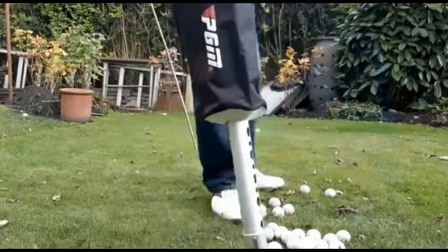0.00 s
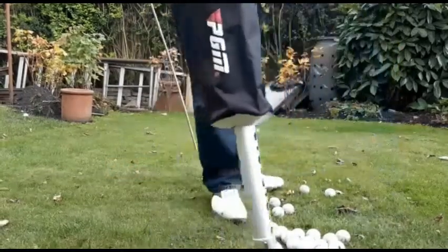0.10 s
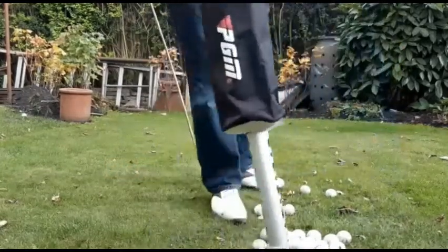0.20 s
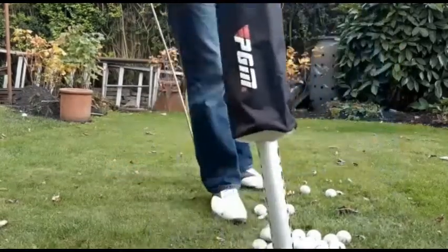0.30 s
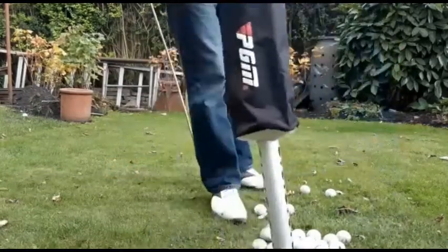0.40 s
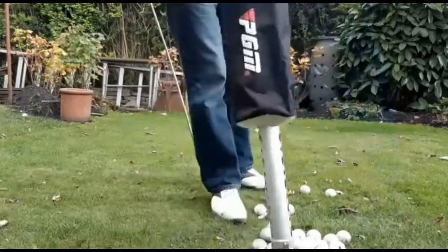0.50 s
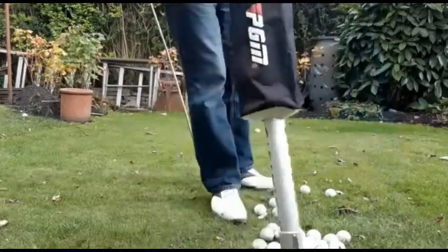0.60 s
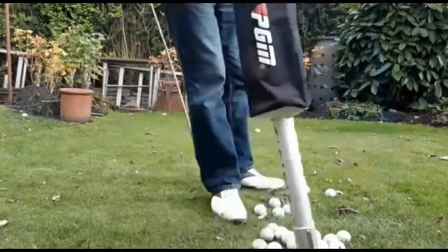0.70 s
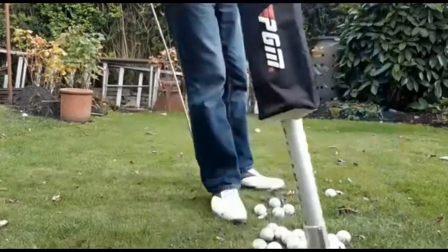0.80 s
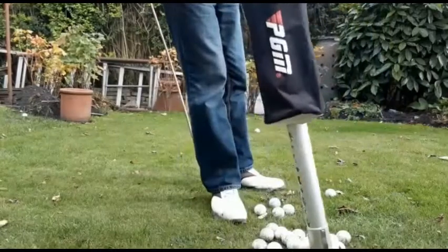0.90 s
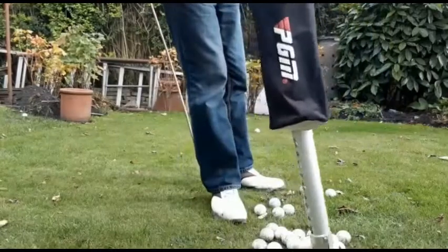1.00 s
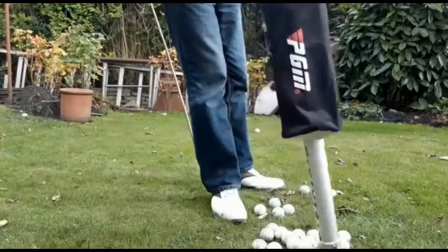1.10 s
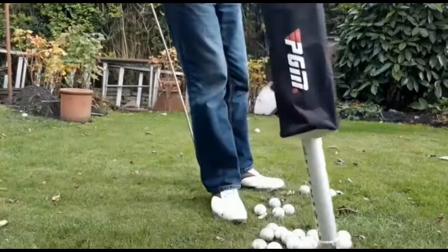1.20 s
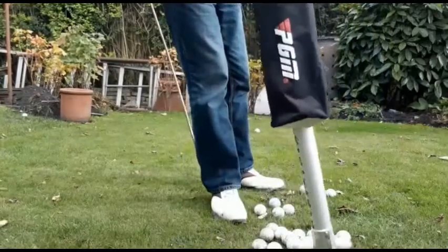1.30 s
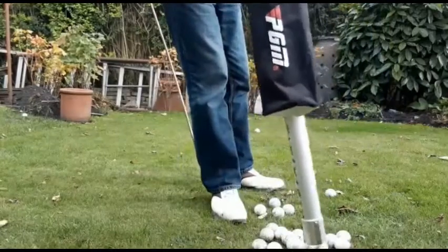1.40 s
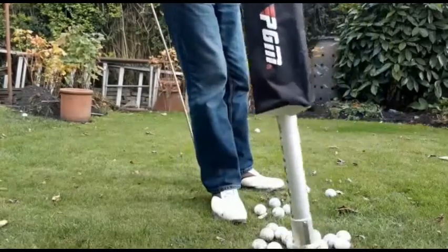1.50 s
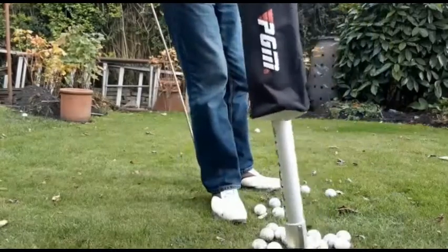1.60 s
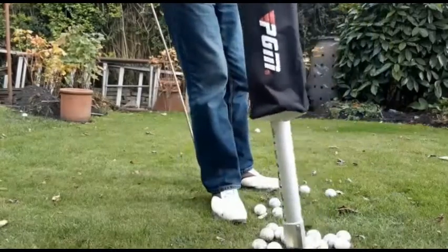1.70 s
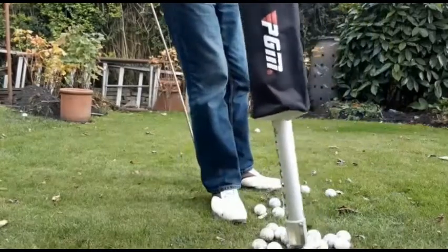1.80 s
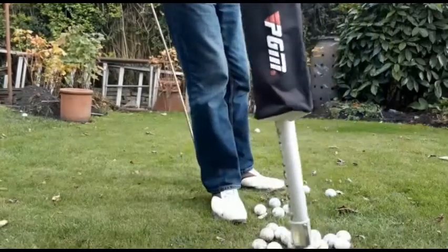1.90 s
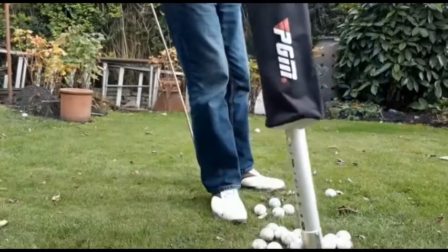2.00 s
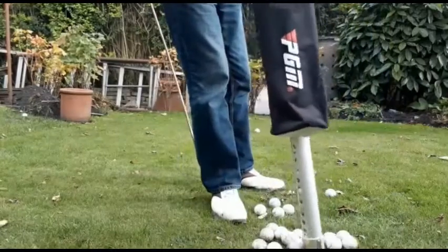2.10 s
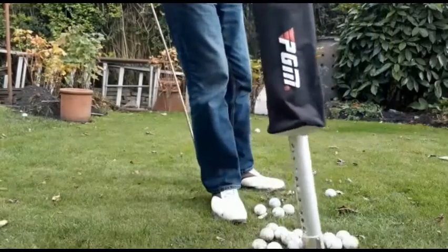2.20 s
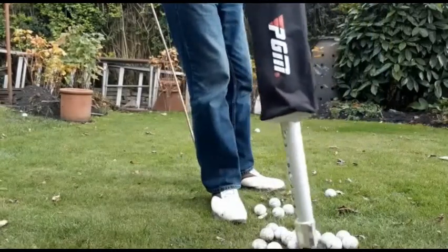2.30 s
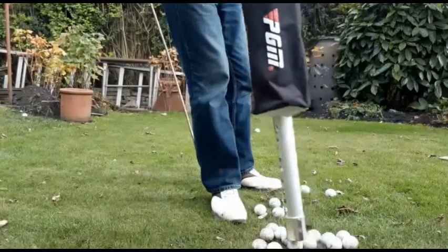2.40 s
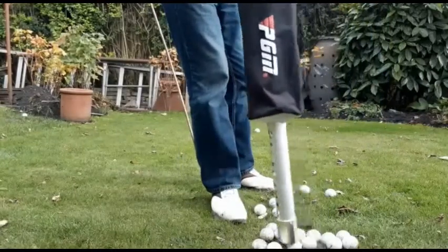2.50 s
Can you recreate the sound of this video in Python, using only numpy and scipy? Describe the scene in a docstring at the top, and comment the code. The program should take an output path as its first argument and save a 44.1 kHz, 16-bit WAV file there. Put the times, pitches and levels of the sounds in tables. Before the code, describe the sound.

Golf balls snap into a hollow aluminium tube on a lawn, heard close and nearly central. Clicks gather from 0.15 s to a ringing clack at 0.32 with a soft thump. A hollow bump at 0.93 leads to a brighter, springy double clack with ball knocks at 1.09. Faint ticks near 1.8, a third clack at 2.07, light contacts from 2.5. Faint hum drops out around 1.45-1.8; soft outdoor air continues.

```python
"""A low hum and distant outdoor noise, then an aluminium pick-up tube is pressed over golf balls on a lawn,
three times, and starts on a fourth. Ball and rim contacts are short noise bursts that excite decaying tube modes;
each ball squeezes past the catch with a loud grainy clack, and balls knock together as pitched tocks.
The catch twangs, the turf answers with thumps and hollow bumps, and the garden returns a faint diffuse tail."""
import sys
import numpy as np
from scipy import signal
from scipy.fft import rfft, irfft, next_fast_len
from scipy.io import wavfile
from scipy.ndimage import map_coordinates

SR = 44100
rng = np.random.default_rng(int(sys.argv[2]) if len(sys.argv) > 2 else 0)


def inscribe(sig):
    """Save sig as 16-bit PCM at rate SR to the path in sys.argv[1].

    A 1-D sig is mono; a 2-D sig holds one channel per row.
    Samples are clipped to [-1, 1] before scaling.
    """
    pcm = np.round(np.clip(np.atleast_2d(sig).T, -1, 1) * 32767)
    wavfile.write(sys.argv[1], SR, pcm.astype(np.int16))


N = 114660  # samples

# a ball snaps past the catch: (t/s, level/dB, swell t60/s, fall t60/s, treble/dB, ring/dB, upper modes/dB, catch/dB)
CLACKS = [(0.318, -14.5, 0.056, 0.089, -3.5, -2, 2, -25),
          (1.092, -15.5, 0.043, 0.065, 7.5, -6.5, 10.5, -3.5), (1.096, -17, .025, 0.069, -4, -3.5, 10, -9),
          (2.072, -16, 0.038, 0.078, -2, -5, 1, -3)]
# spectrum of a light contact or rub: (f/Hz, density/dB per Hz)
CLICK_COLOUR = [(100, -13.5), (330, 0.5), (520, -0.5), (750, -6), (1050, -1.5), (1600, 0), (2100, -10),
                (2900, -6), (4200, -10.5), (5200, -16.5), (8000, -18), (8800, -28.5), (11500, -24.5),
                (15500, -29.5)]
CLICK_RISE_S = 0.0008  # time constant of every struck onset
UPPER_MODES_HZ = 2200  # modes above this have a level of their own
CREEP_PER_S = 0.012  # share by which the tube modes rise each second as the tube fills


def amp(db):
    """Level to amplitude: 20 dB is a factor of ten."""
    return 10 ** (np.asarray(db) / 20)


def unit(x):
    """Normalisation to equal power: rms 1."""
    return x / np.sqrt(np.mean(x ** 2) + 1e-20)


def along(points, hz):
    """Interpolation of (f/Hz, value) points on a logarithmic frequency axis."""
    f, v = np.transpose(points)
    return np.interp(np.log(hz + 1), np.log(f + 1), v)


def fade(t, t60):
    """Exponential decay of a damped vibration, 60 dB in t60."""
    return amp(-60 * t / t60)


def swell(t, rise, fall):
    """Two-sided exponential envelope: grows up to t = 0, then decays, each by 60 dB in its time."""
    growth = fade(np.maximum(-t, 0), rise)
    return growth * fade(np.maximum(t, 0), fall)


def onset(t):
    """Finite contact time: a struck sound builds up exponentially."""
    return 1 - np.exp(-t / CLICK_RISE_S)


def wobble(rate):
    """Random modulation: straight lines between Gaussian knots, rate of them a second."""
    knots = rng.standard_normal(N // 8)
    return map_coordinates(knots, [np.arange(N) * rate / SR], order=1, mode="wrap")


def filtered(x, response):
    """Linear filtering: the spectrum is multiplied by a frequency response."""
    n = x.shape[-1]
    m = next_fast_len(n + 4096)
    return irfft(rfft(x, m) * response(np.fft.rfftfreq(m, 1 / SR)), m)[..., :n]


def below(x, edge_hz):
    """Zero-phase low-pass filter: the gain is one half at the edge."""
    return filtered(x, lambda hz: 1 / (1 + (hz / edge_hz) ** 10))


def noise(colour):
    """Spectral shaping of two unrelated white noises, together of rms 1."""
    white = rng.standard_normal((2, N))
    return unit(filtered(white, lambda hz: amp(along(colour, hz))))


def widen(pair, width):
    """Sum-and-difference stereo: a shared part plus and minus a side part."""
    shared, side = pair[0], width * pair[1]
    return np.array([shared + side, shared - side])


def add(track, s, sound):
    """Superposition: mixes a sound in at time s."""
    part = track[..., max(round(s * SR), 0):][..., :sound.shape[-1]]
    part += sound[..., :part.shape[-1]]


def note(modes, t):
    """Modal superposition: (f/Hz, level/dB, t60/s) damped sines struck at t = 0."""
    sines = sum(amp(db) * fade(t, t60) * np.sin(2 * np.pi * hz * t) for hz, db, t60 in modes)
    return sines * onset(t)


def bands(colour):
    """Band splitting of stereo contact noise into bass, middle and treble."""
    # (f/Hz, side over shared amplitude)
    spread = [(300, 0.092), (2000, 0.072), (5000, 0.22), (12000, 0.6)]
    bass_edge_hz, treble_edge_hz = 790, 5000
    parts = filtered(noise(colour), lambda hz: np.array([np.ones_like(hz), along(spread, hz)]))
    pair = widen(parts, 1)
    bass = below(pair, bass_edge_hz)
    treble = pair - below(pair, treble_edge_hz)
    return bass, pair - bass - treble, treble


def hum():
    """Harmonic tones with random level and phase modulation; they drop away for a while in the middle."""
    # (t/s, level/dB)
    hum_level = [(0, -50.5), (.5, -55.5), (.9, -57.5), (1.3, -52), (1.45, -75), (1.8, -72), (1.98, -51.5),
                 (2.3, -52.5), (2.6, -48.5)]
    # (f/Hz, level/dB)
    partials = [(100, -1.5), (200, 0)]
    t = np.arange(N) / SR
    lines = 0
    for hz, db in partials:
        level = amp(db + 1.7 * wobble(47))  # dB, knots a second
        lines = lines + level * np.sin(2 * np.pi * hz * t + 1.1 * wobble(12))  # rad, knots a second
    return amp(np.interp(t, *np.transpose(hum_level))) * lines


def air():
    """Partially coherent outdoor noise, nearly mono in the upper bass; its hiss comes and goes."""
    # spectrum: (f/Hz, density/dB per Hz)
    spectrum = [(20, -35.5), (40, -17.5), (70, 0), (130, -4), (300, -3.5), (420, -16.5), (900, -12),
                (1600, -16), (2700, -31), (5000, -36), (7500, -36.5), (8600, -45), (16000, -44)]
    # left-right likeness: (f/Hz, correlation)
    likeness = [(30, 0.24), (150, .93), (1000, 0.28), (5000, 0.11)]
    # (t/s, level/dB)
    air_level = [(0, -52), (.7, -51), (1.35, -56.5), (1.5, -53), (1.9, -49.5), (2.3, -54), (2.6, -52)]
    # gain of the treble: (t/s, level/dB)
    treble_level = [(0, -3.5), (.3, 11.5), (.85, -4), (1.35, 9.5), (1.47, -2.5), (1.9, -5.5), (2.25, 4.5),
                    (2.5, -5.5)]
    hiss_edge_hz = 1600
    t = np.arange(N) / SR

    def shares(hz):
        # cos^2 - sin^2 of half the angle is the wanted correlation
        angle = np.arccos(np.clip(along(likeness, hz), -1, 1)) / 2
        return np.array([np.cos(angle), np.sin(angle)])

    pair = widen(filtered(noise(spectrum), shares), 1)
    low = below(pair, hiss_edge_hz)
    hiss = (pair - low) * amp(np.interp(t, *np.transpose(treble_level)))
    level_db = np.interp(t, *np.transpose(air_level)) + 3.17 * wobble(5.564)
    return amp(level_db) * (low + hiss)


def knocks():
    """Modal impact of ball on ball: a short pitched tock whose overtone balance varies with the hit."""
    # (t/s, level/dB, pitch f/Hz, overtones above UPPER_MODES_HZ/dB)
    hits = [(0.073, -42.5, 1480, 0.5), (1.01, -34.5, 1313, -8.5), (1.013, -28.5, 1565, 3),
            (1.024, -31.5, 1586, 4), (1.074, -30.5, 1500, 5), (1.096, -20.5, 1553, 6),
            (1.663, -56, 1450, -10), (1.785, -45, 1484, -5.5), (1.99, -29.5, 1642, 3),
            (2.031, -27.5, 1612, 9.5)]
    # (multiple of the pitch, level/dB, t60/s)
    ball_modes = [(1, 4, .075), (1.12, -13.5, .05), (1.78, -3.5, .055), (2.35, -9, .06)]
    out, t = np.zeros(N), np.arange(SR // 8) / SR
    for s, db, pitch, overtones_db in hits:
        modes = []
        for multiple, level, t60 in ball_modes:
            hz = pitch * multiple
            modes.append((hz, level + overtones_db * (hz > UPPER_MODES_HZ), t60))
        add(out, s, amp(db) * note(modes, t))
    return out


def ring(blows):
    """Modal excitation of the damped tube: each (t/s, level/dB, upper modes/dB) blow weights the modes anew."""
    # modes of the tube held against the turf: (f/Hz, level/dB, t60 before choking/s)
    tube_modes = [(505, -14, .25), (1036, -9, .3), (1120, -16, 0.14), (1345, -14, 0.18), (1445, -12, .1),
                  (1540, -12, .12), (2780, -14, 0.16), (2900, -6.5, 0.17), (3045, -13, .14),
                  (3250, -19, .11), (3510, -21, 0.1), (3930, -18, 0.09), (6210, -30, .2)]
    choke_s = 0.054  # turf and balls smother the ring after about this long
    scatter_db = 2.5  # standard deviation of each mode's level
    out, t = np.zeros(N), np.arange(SR // 4) / SR
    hz, db, t60 = np.transpose(tube_modes)[..., None]
    decays = amp(db) * fade(t, t60) * np.exp(-(t / choke_s) ** 2) * onset(t)
    for s, level, upper in blows:
        scatter = scatter_db * rng.standard_normal(hz.shape)
        sizes = amp(level + upper * (hz > UPPER_MODES_HZ) + scatter)
        cycles = hz * (1 + CREEP_PER_S * s) * t + rng.random(hz.shape)
        add(out, s, np.sum(sizes * decays * np.sin(2 * np.pi * cycles), axis=0))
    return out


def clicks():
    """Impulsive contact: a noise crack with a tail, which also excites the tube's modes."""
    # a ball touches the rim, the wall or another ball: (t/s, level/dB, treble/dB, bass/dB, ring/dB)
    contacts = [(0.074, -46.5, -4, 10.5, -9), (0.136, -42.5, 17.5, 4.5, -2), (.148, -35.5, 0, -2, -5),
                (.173, -27.5, 0, -7, -8), (0.182, -32, 2, -2, -10), (0.201, -24, -6.5, -0.5, -17),
                (0.231, -33, -1, 5, 5), (0.256, -42, 8, 3, 2), (0.288, -35, 2, 5, -3),
                (.299, -23, -9, -11, -17), (0.341, -21, -2.5, 2, -18), (0.353, -25, -3, -4, -6),
                (.362, -25.5, -3, -13, 1.5), (.377, -28, 0, -4, -19), (0.409, -38, 3, 7, 3),
                (0.434, -41, -7, 5, -14), (.487, -47.5, 0, 7, -4), (0.53, -45, -17, -6, -1),
                (0.919, -48.5, -7, 3, 0.5), (0.936, -51.5, 15.5, 14, -2), (0.943, -42.5, -8, 0, -12),
                (1.007, -27, -6, -7, -16), (1.023, -26, 1.5, -7.5, -34), (1.033, -28, 0, 4.5, -26),
                (1.043, -26.5, -2, -6, -17), (1.059, -31.5, -2, -1, 2), (1.071, -24.5, 4.5, -1.5, -7.5),
                (1.09, -19, -6, -1, -12.5), (1.158, -48.5, 14, 20.5, -16), (1.175, -37, -7, -2, 1),
                (1.195, -35.5, -9, 0.5, -30), (1.24, -47, -17, 8, -18), (1.281, -48.5, -3, -1, -18),
                (1.298, -47, -2.5, -5, -3.5), (1.784, -45, -10, -2, -15.5), (1.94, -52.5, -17, 13, -14.5),
                (1.976, -31, -11.5, -5, -18.5), (1.989, -32, 1.5, 0.5, -12), (2, -24, -12, -20, -4),
                (2.010, -21, 4, -4.5, -15), (2.028, -21.5, 1, 0, -9.5), (2.055, -26.5, 1, 6.5, -14),
                (2.096, -29, -5, 7.5, -11), (2.12, -39, 5, 3, 10), (2.151, -36.5, 1, 8.5, -3.5),
                (2.217, -54, -6, 5.5, -10), (2.507, -41.5, 3.5, 5, -18), (2.521, -30, 1, 6, -13),
                (2.578, -51, 6, 13, 3), (2.591, -35.5, -12, 4, -12)]
    click_db, click_ring_db = -1.5, 1.5  # added to every level and every ring
    crack_db, crack_t60_s, tail_t60_s = 1.5, 0.012, 0.1  # crack level is over the tail
    power, t = np.zeros((3, N)), np.arange(SR // 8) / SR
    shape = (amp(crack_db) * fade(t, crack_t60_s) + fade(t, tail_t60_s)) * onset(t)
    for s, db, treble, bass, _ in contacts:
        band_db = click_db + db + np.array([[bass], [0], [treble]])
        add(power, s, (amp(band_db) * shape) ** 2)  # unrelated bursts add in power
    cracks = sum(np.sqrt(p) * band for p, band in zip(power, bands(CLICK_COLOUR)))
    return cracks + ring([(s, db + ring_db + click_ring_db, 0) for s, db, _, _, ring_db in contacts])


def free_ring():
    """Light damping: a tube struck clear of the turf sings in a few clear modes until the turf smothers it."""
    # (f/Hz, level/dB, t60 before smothering/s)
    free_modes = [(1035, -2, .42), (1355, -13, .24), (2801, -11, .27), (2889, -14, .22), (3128, -17, .2),
                  (5185, -21, .36), (5508, -30, .27)]
    # (t/s, level/dB, smothering time of the lowest mode/s, brightness/dB per octave)
    free_blows = [(.203, -25, .06, 0), (.319, -15.5, .105, 1.5), (1.034, -17.5, .015, -9),
                  (2.119, -34, .06, -5)]
    out, t = np.zeros(N), np.arange(SR // 3) / SR
    for s, db, smother, tilt in free_blows:
        for hz, level, t60 in free_modes:
            ratio = hz / free_modes[0][0]
            lasts = smother * np.sqrt(ratio)  # the low modes move the rim most and stop first
            mode = (hz * (1 + CREEP_PER_S * s), db + level + tilt * np.log2(ratio), t60)
            add(out, s, note([mode], t) * np.exp(-(t / lasts) ** 4))
    return out


def rubs():
    """Sliding friction: grainy noise in bell-shaped strokes while the rim finds the next ball."""
    # the rim rubs over balls and grass: (t/s, half length/s, level/dB, treble/dB)
    strokes = [(0.247, 0.041, -42, -2), (0.373, 0.024, -42.5, 10), (0.807, 0.046, -67, 11.5),
               (0.995, 0.04, -47.5, 5), (1.124, 0.025, -42, -5.5), (1.67, 0.015, -61, -18),
               (1.982, 0.015, -48.5, -6), (2.567, 0.024, -53.5, -5)]
    grain_db, grains_per_s = 2, 970
    t = np.arange(N) / SR
    bass, middle, treble = bands(CLICK_COLOUR)
    friction = 0
    for s, half, db, treble_db in strokes:
        bell = np.exp(-np.minimum(((t - s) / half) ** 2, 100) / 2)
        friction = friction + amp(db) * bell * (bass + middle + amp(treble_db) * treble)
    return friction * unit(amp(grain_db * wobble(grains_per_s)))


def clacks():
    """Friction and release: the catch scrapes over the ball and lets go, exciting the tube's modes."""
    # (f/Hz, density/dB per Hz)
    clack_colour = [(100, -22), (300, -3.5), (520, -3.5), (750, -4.5), (1050, 0), (1550, 0), (2100, -8),
                    (2900, -3), (3900, -4.5), (4900, -12.5), (7800, -10), (8900, -17.5), (12000, -15.5),
                    (15500, -17.5)]
    clack_ring_db = -1  # added to every ring
    grain_db, grains_per_s = 0.5, 940
    power, t = np.zeros((3, N)), np.arange(-SR // 8, SR // 3) / SR
    for s, db, rise, fall, treble, *_ in CLACKS:
        band_db = db + treble * np.array([[0], [0], [1]])
        add(power, s + t[0], (amp(band_db) * swell(t, rise, fall)) ** 2)
    grain = unit(amp(grain_db * wobble(grains_per_s)))
    scrape = grain * sum(np.sqrt(p) * band for p, band in zip(power, bands(clack_colour)))
    blows = [(s, db + ring_db + clack_ring_db, upper) for s, db, _, _, _, ring_db, upper, _ in CLACKS]
    return scrape + ring(blows)


def twangs():
    """Free vibration of a released spring: the catch twangs as it lets go."""
    # (f/Hz, level/dB, t60/s)
    catch_modes = [(3655, 0.5, .045), (3960, -3, 0.076), (4200, -3, 0.073)]
    out, t = np.zeros(N), np.arange(SR // 8) / SR
    for s, db, *_, catch_db in CLACKS:
        add(out, s, amp(db + catch_db) * note(catch_modes, t))
    return out


def thumps():
    """Dull impact on soft ground: low noise swells and dies as the rim pushes into the lawn."""
    # (f/Hz, density/dB per Hz)
    thump_colour = [(25, -65), (42, -21.5), (65, -2), (115, 4.5), (200, -6), (400, -19.5), (1000, -76.5)]
    # the tube lands on the turf: (t/s, level/dB)
    landings = [(0.333, -32.5), (1.118, -37.5), (2.089, -41), (2.189, -51)]
    swell_t60_s, fall_t60_s = 0.047, 0.38
    t = np.arange(N) / SR
    envelope = sum(amp(db) * swell(t - s, swell_t60_s, fall_t60_s) for s, db in landings)
    return envelope * noise(thump_colour)[0]


def bumps():
    """Heavily damped resonance: one low hollow note for each ball shoved into the turf."""
    # (t/s, level/dB, pitch f/Hz)
    shoves = [(.935, -34, 367), (1.157, -44, 444), (2.521, -41, 424)]
    bump_t60_s = 0.1
    out, t = np.zeros(N), np.arange(SR // 8) / SR
    for s, db, hz in shoves:
        soft_start = 1 - np.exp(-t * hz)  # time constant of one period
        add(out, s, note([(hz, db, bump_t60_s)], t) * soft_start)
    return out


def garden(x):
    """Diffuse scattering by fence and shrubs: convolution with a short noise tail whose bass lasts longest."""
    # (f/Hz, t60/s)
    decay_times = [(200, 0.8), (1200, 0.39), (3500, 0.27), (8000, 0.29), (15000, 0.27)]
    build_up_s, width = 0.0077, 0.77  # time constant; side over shared part
    hz, t, z = signal.stft(rng.standard_normal((2, SR // 2)), SR, nperseg=256)
    envelope = fade(t, along(decay_times, hz)[:, None]) * (1 - np.exp(-t / build_up_s))
    tail = signal.istft(z * envelope, SR, nperseg=256)[1]
    tail = widen(tail, width)
    return signal.fftconvolve(x, tail / np.linalg.norm(tail[0]), axes=1)[:, :N]


def scene():
    """Interaural differences: the tube is later on the left, and the right channel is a little louder."""
    # the tube moves to the right and back: (t/s, lag of the left channel/ms)
    left_lag = [(.2, 0.014), (0.351, 0.032), (0.999, 0.061), (1.099, 0.06), (2.052, 0.054), (2.55, 0.037)]
    garden_db, right_db = -18, 0.61  # the right is raised and the left lowered by right_db
    left, right = knocks() + clicks() + free_ring() + rubs() + clacks() + twangs() + thumps() + bumps()
    lag = np.interp(np.arange(N) / SR, *np.transpose(left_lag)) * SR / 1000  # samples
    tube = np.array([map_coordinates(left, [np.arange(N) - lag]), right])
    return (hum() + air() + tube + amp(garden_db) * garden(tube)) * amp([[-right_db], [right_db]])


def record(dry):
    """Band limitation: a very steep low-pass filter leaves almost nothing above its edge."""
    top_hz = 16000
    return filtered(dry, lambda hz: 1 / np.sqrt(1 + (hz / top_hz) ** 400))


dry = scene()
out = record(dry)
inscribe(out)
```